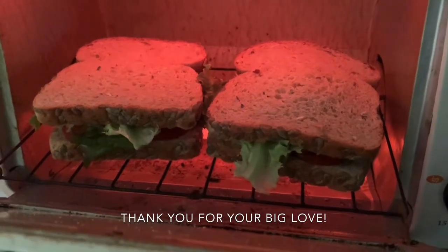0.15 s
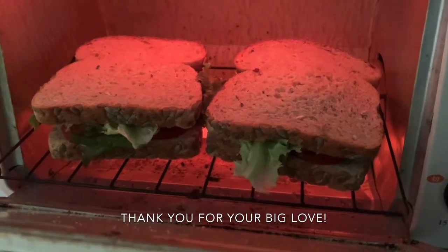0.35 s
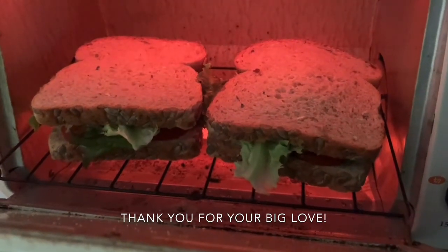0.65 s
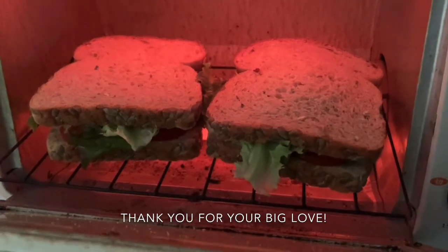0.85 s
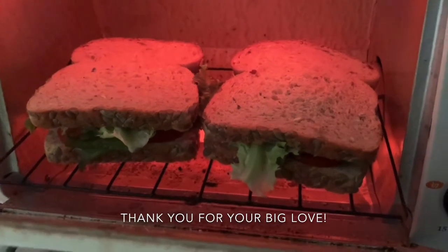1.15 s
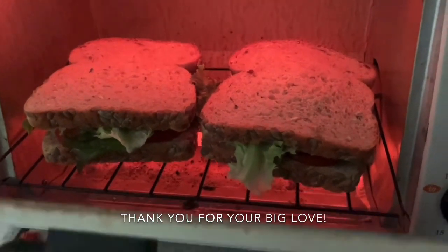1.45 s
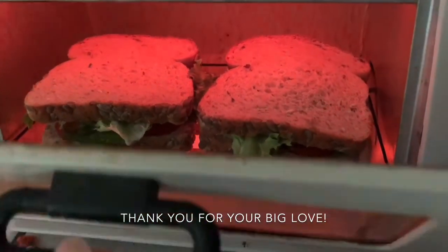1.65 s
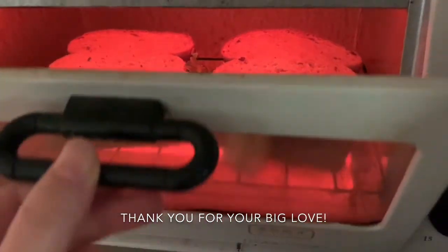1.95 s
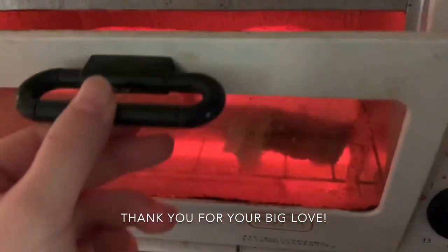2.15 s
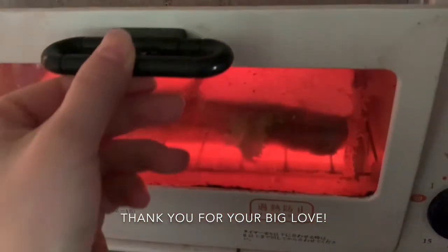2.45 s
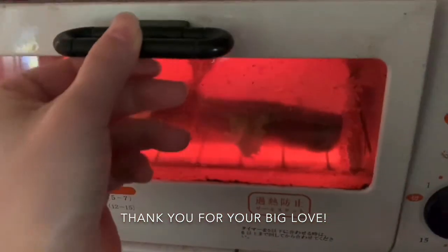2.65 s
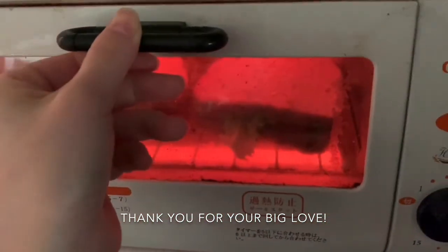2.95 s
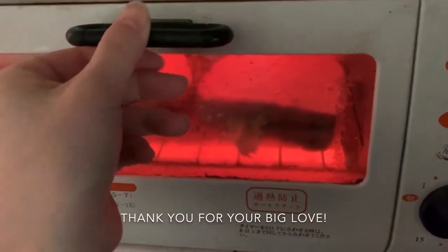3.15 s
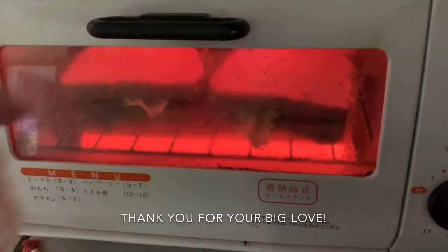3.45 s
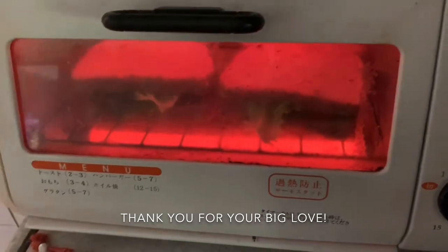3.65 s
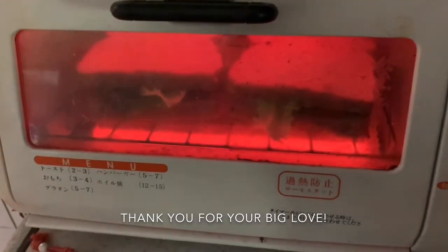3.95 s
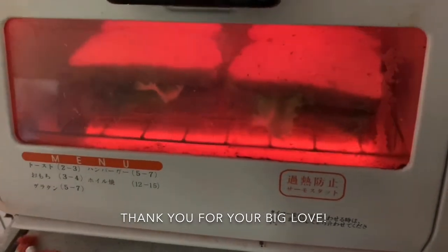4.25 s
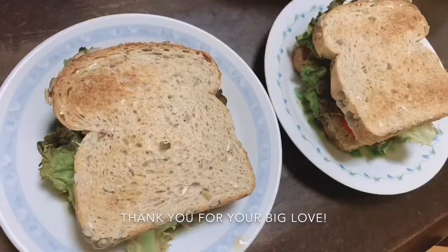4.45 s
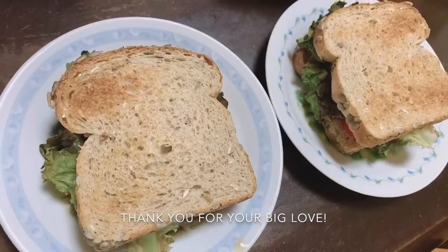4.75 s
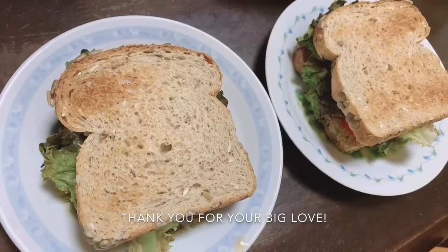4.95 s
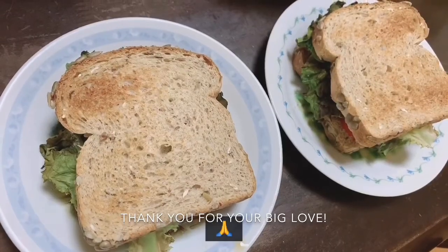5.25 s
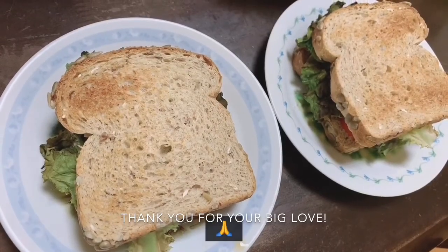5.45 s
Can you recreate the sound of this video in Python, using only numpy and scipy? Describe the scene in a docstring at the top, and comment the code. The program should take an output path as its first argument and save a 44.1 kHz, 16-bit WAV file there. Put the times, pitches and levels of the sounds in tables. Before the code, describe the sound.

Close stereo pickup of a mechanical timer: crisp, swaying tick-tock over faint low hum and room noise, each blow leaving a short tinny, hollow ring. A door knock lands around three seconds, followed by muffled settling thuds. The sound then switches abruptly to a quiet table, centred and mono, with a low rumbling hum and a few soft crockery taps.

```python
"""The clockwork timer of a toaster oven ticks in a kitchen: two pallets land in turn on a swaying beat, each
blow exciting coloured noise and decaying modes of the sheet-metal case over a low hum and room noise. At about
3 s the door is pushed shut with a knock, low-passed by its contact, and soft bumps follow. After a short
silence the scene is the table: a deeper hum, shaped room noise and faint clinks of dishes, each clink a click,
a dull tap and one sine that dies away."""
import sys
import numpy as np
from scipy import signal
from scipy.fft import rfft, irfft, next_fast_len
from scipy.io import wavfile

SR = 44100
rng = np.random.default_rng(int(sys.argv[2]) if len(sys.argv) > 2 else 0)


def put_to_file(sound):
    """Save the sound as 16-bit audio at rate SR, in the file named by the first command-line argument."""
    columns = np.atleast_2d(sound).T  # one column per channel
    safe = np.clip(columns, -1, 1)
    whole_steps = np.round(safe * 32767)
    wavfile.write(sys.argv[1], SR, whole_steps.astype(np.int16))


N = 246341
TIME = np.arange(N) / SR
AGE = TIME[:SR // 2]  # time since a blow, s
OVEN_END_S, TABLE_START_S = 4.352, 4.39
TREBLE_LAG_S = .000215  # delay of the ticks' noise treble on the right

# snap of the escapement: f/Hz, spectral level/dB per Hz
STEEL_COLOUR = [(500, -19), (1500, -3), (3200, -8), (5200, -10), (6300, 0.5), (8500, 1.5), (10500, -3.5),
                (12000, -11), (13500, 6), (15500, -4.5), (16500, -24)]
# left-right likeness of the steel snap: f/Hz, correlation
STEEL_LIKENESS = [(1000, 0.2), (4000, 0.17), (9000, 0.84)]
# dense ring of the case: f/Hz, spectral level/dB per Hz
CASE_COLOUR = [(300, -21.5), (650, -7), (820, -4.5), (1100, -2.5), (1400, -8.5), (1750, -2), (2500, -6),
               (3300, -3), (5000, -8), (7500, -8.5), (11000, -2), (15000, -40.5), (16500, -41)]
# strongest panel modes of the case and air modes inside it: f/Hz, level/dB, t60/s
PANEL_MODES = [(812, -1.5, 0.34), (913, -20, 0.93), (1052, -1.5, 0.33), (1077, 1, 0.15), (1212, -2, 0.28),
               (1272, 0.5, 0.26), (1642, 4.5, 0.2), (1762, 3, 0.22), (2210, 0.5, 0.21), (3170, -4, 0.22),
               (3350, 0.5, 0.16)]
# dense ring of the oven cavity: f/Hz, spectral level/dB per Hz
CAVITY_COLOUR = [(150, -16), (330, -13), (480, -3.5), (600, 0.5), (720, -13), (1200, -24.5)]
# strongest modes of the oven cavity: f/Hz, level/dB, t60/s
CAVITY_MODES = [(399.3, -6.5, 0.44), (469, -7, 0.26), (523.4, -1.5, 0.34), (584.5, -2.5, 0.4),
                (602, -3.5, 0.31), (713, -8.5, 0.41)]
# left minus right level of the ticks: f/Hz, level difference/dB
TICK_BALANCE = [(500, 1.1), (1700, -0.5), (2500, -1.5), (5500, -2.5), (7500, -0.4), (12000, 0)]
# a tooth slides off just before the beat and lands just after it
SLIDE_LEAD_S, SLIDE_DB, LANDING_S = .0026, -13, .0012


def escapement(same_share):
    """Impact excitation: a tooth slides off, lands and rebounds, driving the steel, the case and the cavity."""
    out, size = np.zeros((2, N)), len(AGE)
    # power shares of the case's ring that repeat, and that are new at each beat
    kept, fresh = np.sqrt(np.clip([same_share, 1 - same_share], 0, 1))
    cases = [noise(CASE_COLOUR, RING_LIKENESS, size, TREBLE_LAG_S) for _ in range(2)]
    steels = [
        resonant(noise(STEEL_COLOUR, STEEL_LIKENESS, size, TREBLE_LAG_S), depth_db=1.5, width_hz=100)
        for _ in range(2)
    ]
    # a quick snap, then its echo in the room
    steel_fade = swell(0.00025) * (fade(t60=0.029) + from_db(-8.5) * fade(t60=0.13))

    for k, (s, snap_db, case_db, cavity_db, rebound_db, rebound_s) in enumerate(beats()):
        steel = resonant(steels[k % 2], depth_db=4.0, width_hz=210) * steel_fade
        steel = from_db(snap_db - 5.0) * steel
        # slide, landing and one rebound
        contacts = ((-SLIDE_LEAD_S, SLIDE_DB), (LANDING_S, 0), (rebound_s, min(rebound_db, -1)))
        for delay, db in contacts:
            contact = signal.fftconvolve(steel, chatter(spread_s=.003, grain_db=-9.5))
            add(out, s + delay, from_db(db) * contact)

        # the blow spreads into the sheet metal and the air inside, which build up slowly and ring longer
        dense = kept * cases[k % 2] + fresh * noise(CASE_COLOUR, RING_LIKENESS, size, TREBLE_LAG_S)
        dense = die_away(resonant(dense, depth_db=2.5, width_hz=60))
        case = from_db(6.0) * dense + from_db(-8.5) * modes(PANEL_MODES, spread_db=3.5)
        hollow = die_away(noise(CAVITY_COLOUR, RING_LIKENESS, size))
        cavity = from_db(-2.5) * hollow + from_db(-4.0) * modes(CAVITY_MODES, spread_db=3.5)
        add(out, s, (from_db(case_db) * case + from_db(cavity_db) * cavity) * swell(0.0082))

    padded = next_fast_len(N)
    balance_db = at_hz(TICK_BALANCE, np.fft.rfftfreq(padded, 1 / SR))
    balance = from_db(balance_db * [[.5], [-.5]])  # half the difference to each channel
    return irfft(rfft(out, padded) * balance, padded)[:, :N]


# the two pallets, tick and tock: lateness/s, steel level/dB, case level/dB, cavity level/dB,
# rebound level relative to the landing/dB, rebound delay/s
PALLETS = [(-0.00028, -30.4, -43, -51.5, -3, .01), (-.001, -32.6, -48.7, -49.7, -11.5, .0095)]
# the balance beats evenly, gaining a little speed at every beat
FIRST_BEAT_S, BEAT_S, BEAT_SHORTENS_S = .0008, .21306, .000094
# the escape wheel runs slightly out of true: it lags most on one beat of each turn
BEATS_PER_TURN, LATEST_BEAT, WHEEL_LAG_S = 8, 7, .0037
WHEEL_SNAP_DB, WHEEL_CAVITY_DB = 1.6, -2.1  # peak swing of level over one turn
# chance from beat to beat: log spread of the rebound delay, spread of the blow's strength
REBOUND_SCATTER, FORCE_SCATTER_DB = .25, .3


def beats():
    """Near-periodic motion modulated once per wheel turn; rows like PALLETS, with times for lateness."""
    rows = []
    for k in range(int(OVEN_END_S / BEAT_S) + 1):
        late_s, snap_db, case_db, cavity_db, rebound_db, rebound_s = PALLETS[k % 2]
        wheel = np.cos(2 * np.pi * (k - LATEST_BEAT) / BEATS_PER_TURN)
        even_s = FIRST_BEAT_S + k * (BEAT_S - BEAT_SHORTENS_S * k / 2)
        s = even_s + late_s + WHEEL_LAG_S * wheel
        force_db = FORCE_SCATTER_DB * rng.normal()
        stretch = np.exp(REBOUND_SCATTER * rng.normal())
        rows.append((s, snap_db + force_db + WHEEL_SNAP_DB * wheel, case_db + force_db,
                     cavity_db + WHEEL_CAVITY_DB * wheel, rebound_db, rebound_s * stretch))
    return rows


def chatter(spread_s, grain_db):
    """Repeated impact: one firm contact and a few tiny ones after it, of unit energy together."""
    clicks = np.zeros(SR // 20)
    at = np.clip(rng.exponential(spread_s, size=6) * SR, 1, len(clicks) - 1).astype(int)
    clicks[at] = from_db(grain_db) * rng.standard_normal(size=6)
    clicks[0] = 1
    return clicks[None] / np.linalg.norm(clicks)


# blows on the door and frame, and a soft bump: t/s, level/dB, contact cut-off f/Hz, low thump level/dB
KNOCKS = [(3.009, -29.5, 9000, -46), (3.046, -41.5, 1980, -55), (3.122, -44.5, 700, -50),
          (3.173, -46, 1210, -51), (3.191, -42.5, 576, -64), (3.819, -46.5, 450, -38.5),
          (4.296, -50, 250, -48.5)]
# modes of the door, damped by the frame and the hand: f/Hz, level/dB, t60/s
DOOR_MODES = [(179.6, -2.5, 0.12), (244, -4, 0.12), (325.6, 1.5, 0.074), (432, -0.5, 0.054),
              (527, -3.5, 0.13), (834.6, -10, 0.22), (1065, -15, 0.24), (1490, -0.5, 0.055),
              (1815, -2, 0.1), (2140, -17, .14), (3090, -6, 0.06)]
# dead knock of the door: f/Hz, spectral level/dB per Hz
KNOCK_COLOUR = [(80, -10.5), (170, -2), (290, 8.5), (450, -10.5), (680, -10), (900, -6), (1250, -8),
                (1520, -6), (1700, -13), (1880, -3.5), (2500, -15), (3200, -14), (6000, -22), (14000, -27)]
# low thump of each blow or bump: f/Hz, spectral level/dB per Hz
THUMP_COLOUR = [(25, -20), (70, 5), (140, 2), (260, -14), (600, -36), (3000, -70)]
# left-right likeness of the thump: f/Hz, correlation
THUMP_LIKENESS = [(40, .3), (90, 0.85), (160, 0.81)]


def door():
    """Contact filtering: soft blows low-pass the knock, modes and room tail; a low thump is added."""
    out, size = np.zeros((2, N)), len(AGE)
    for s, db, contact_hz, thump_db in KNOCKS:
        knock = from_db(1.0) * noise(KNOCK_COLOUR, RING_LIKENESS, size) * fade(t60=0.063) * swell(0.00017)
        ring = from_db(-2.0) * modes(DOOR_MODES, spread_db=1.0) * swell(0.0019)
        tail = from_db(-9.5) * die_away(noise(KNOCK_COLOUR, RING_LIKENESS, size)) * swell(0.0063)
        contact = signal.butter(2, min(contact_hz, SR / 3), fs=SR, output="sos")
        add(out, s, from_db(db) * signal.sosfilt(contact, knock + ring + tail))
        thump = noise(THUMP_COLOUR, THUMP_LIKENESS, size) * fade(t60=0.21) * swell(0.0028)
        add(out, s, from_db(thump_db) * thump)
    return out


# dishes touching: t/s, tap level/dB, lowest strong f of the tap/Hz, ring f/Hz, ring level/dB, click level/dB
CLINKS = [(4.557, -49, 540, 2130, -51.5, -65), (4.74, -50.5, 1470, 1482, -49.5, -59),
          (4.757, -54.5, 1470, 1610, -62, -45), (4.87, -55, 500, 823, -58, -72)]
# left-right likeness of mono sound: f/Hz, correlation
CENTRED = [(20, 1), (20000, 1)]


def dishes():
    """Damped free vibration: each touch of crockery is a tiny click, a dull tap and one ringing mode."""
    out, size = np.zeros((2, N)), len(AGE)
    click_colour = [(1000, 2), (2600, -5), (12000, -10)]
    for s, tap_db, low_hz, ring_hz, ring_db, click_db in CLINKS:
        click = from_db(click_db) * noise(click_colour, CENTRED, size) * fade(t60=0.01)
        tap_colour = [(low_hz / 2, -14), (low_hz, 0), (2700, -7), (3300, -22), (12000, -32)]
        tap = resonant(noise(tap_colour, CENTRED, size), depth_db=4.0, width_hz=47)
        tap = from_db(tap_db) * tap * fade(t60=0.3)
        ring = from_db(ring_db) * np.sin(2 * np.pi * ring_hz * AGE) * fade(t60=0.32)
        add(out, s, click + (tap + ring) * swell(0.00062))
    return out


# room noise by the oven: f/Hz, spectral level/dB per Hz
KITCHEN_AIR = [(22, -29), (36, -15), (50, -2.5), (90, -0.5), (130, -1.5), (175, -6), (230, -10), (400, -16),
               (800, -28), (1600, -24.5), (3000, -34.5), (7000, -37.5), (11000, -41.5), (16000, -50)]
# left-right likeness of the room noise by the oven: f/Hz, correlation
AIR_LIKENESS = [(30, 0.61), (80, 0.72), (150, 0.88), (400, 0.82), (1000, 0.83), (2000, 0.21), (8000, 0.3)]


def kitchen_air():
    """Stationary noise: the room by the oven in stereo, with a low hum."""
    low_hum = hum(hz=86.2, waver_hz=1.73, flutter_db=2.5)
    return from_db(-61) * noise(KITCHEN_AIR, AIR_LIKENESS, N) + from_db(-61.0) * low_hum


# room noise at the table: f/Hz, spectral level/dB per Hz
TABLE_AIR = [(20, -0.5), (45, -16), (70, -4), (100, -1.5), (200, -6.5), (330, -6.5), (520, -16),
             (1100, -22.5), (2800, -27), (4400, -35.5), (6600, -31.5), (10000, -38), (16000, -52)]


def table_air():
    """Stationary noise: the room at the table in mono, with a deeper hum."""
    deep_hum = hum(hz=46.9, waver_hz=0.63, flutter_db=1.2)
    return from_db(-52.5) * noise(TABLE_AIR, CENTRED, N) + from_db(-51.0) * deep_hum


def hum(hz, waver_hz, flutter_db):
    """Frequency and amplitude modulation: a low tone wanders in pitch and level."""
    knots = np.linspace(0, TIME[-1], num=45)
    pitch, level = (np.interp(TIME, knots, row) for row in rng.standard_normal((2, len(knots))))
    phase = 2 * np.pi * np.cumsum(hz + waver_hz * pitch) / SR
    return np.sqrt(2) * from_db(flutter_db * level) * np.sin(phase)


# left-right likeness of ringing bodies: f/Hz, correlation
RING_LIKENESS = [(150, 1), (330, 0.8), (600, 0.51), (1000, 0.41), (1700, 0.14), (3500, 0.13), (6000, 0.14),
                 (10000, 1)]


def modes(table, spread_db):
    """Modal superposition: damped sines of new strength; less alike ones differ more in phase left to right."""
    out = 0
    for hz, db, t60 in table:
        alike = np.clip(at_hz(RING_LIKENESS, hz), 0, 1)
        skew = rng.normal() * np.arccos(alike) * np.array([[.5], [-.5]])
        strength = from_db(db + spread_db * rng.normal())
        out = out + strength * fade(t60) * np.sin(2 * np.pi * (hz * AGE + rng.random()) + skew)
    return out


# decay of case and kitchen together: f/Hz, t60/s
DECAY = [(150, 0.75), (550, 0.36), (1500, 0.31), (3500, 0.21), (7000, 0.16), (15000, 0.07)]


def die_away(x):
    """Frequency-dependent damping: every band of a dense ring dies at its own rate."""
    hz, bins = np.fft.rfftfreq(len(AGE), 1 / SR), rfft(x)
    knots, t60s = np.transpose(DECAY)
    # overlapping bands that sum to one
    shares = [at_hz(np.c_[knots, row], hz) for row in np.eye(len(knots))]
    return sum(irfft(bins * share, len(AGE)) * fade(t60) for share, t60 in zip(shares, t60s))


def resonant(x, depth_db, width_hz):
    """Modal overlap: many close resonances of small parts raise random peaks in the spectrum."""
    hz = np.fft.rfftfreq(len(AGE), 1 / SR)
    peaks = rng.standard_normal(size=2000)
    curve_db = depth_db * np.interp(hz / width_hz, np.arange(len(peaks)), peaks)
    return rms_one(irfft(rfft(x) * from_db(curve_db), len(AGE)))


def noise(spectrum, likeness, size, lag=0):
    """Interchannel coherence: coloured stereo noise of rms 1; its treble comes lag seconds later on the right."""
    hz = np.fft.rfftfreq(size, 1 / SR)
    mid, side = rfft(rng.standard_normal((2, size))) * from_db(at_hz(spectrum, hz))
    alike = np.clip(at_hz(likeness, hz), -1, 1)
    left, right = np.sqrt(1 + alike) * mid + np.sqrt(1 - alike) * side * [[1], [-1]]
    treble = hz ** 4 / (hz ** 4 + 1400 ** 4)  # the lag sets in around 1400 Hz
    return rms_one(irfft([left, right * np.exp(-2j * np.pi * hz * lag * treble)], size))


def fade(t60):
    """Exponential decay: 60 dB in t60 seconds."""
    return np.exp(-np.log(1000) * AGE / t60)


def swell(rise_s):
    """Energy build-up: exponential approach to full level as vibration spreads through a body."""
    return 1 - np.exp(-AGE / rise_s)


def from_db(db):
    """Logarithmic level: decibels to amplitude gain."""
    return 10 ** (np.asarray(db) / 20)


def rms_one(x):
    """Power normalisation: scale to unit rms."""
    return x / np.sqrt(np.mean(x ** 2) + 1e-20)


def at_hz(points, hz):
    """Logarithmic frequency: read a table by linear interpolation on a log axis."""
    knots, values = np.transpose(points)
    return np.interp(np.log(hz + 1), np.log(knots), values)


def add(out, s, sound):
    """Linear superposition: mix a sound in at time s."""
    start = max(round(s * SR), 0)
    out[:, start:start + sound.shape[-1]] += sound[..., :N - start]


def scene():
    """Superposition of sources: first by the oven in stereo, then, after a short silence, at the table in mono."""
    by_oven = escapement(same_share=0.46) + door() + kitchen_air()
    at_table = dishes() + table_air()
    return by_oven * (TIME < OVEN_END_S) + at_table * (TIME > TABLE_START_S)


def record(dry):
    """Band limitation: a steep elliptic low-pass removes the top above 16 kHz."""
    low_pass = signal.ellip(10, .2, 80, 16000, fs=SR, output="sos")  # ripple dB, stopband dB, Hz
    return signal.sosfilt(low_pass, dry)


dry = scene()
out = record(dry)
put_to_file(out)
```